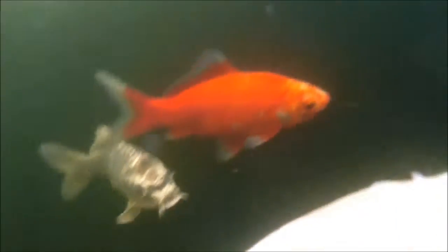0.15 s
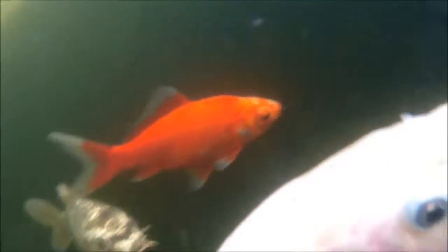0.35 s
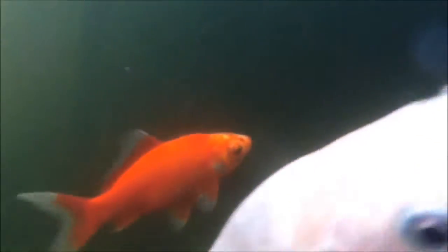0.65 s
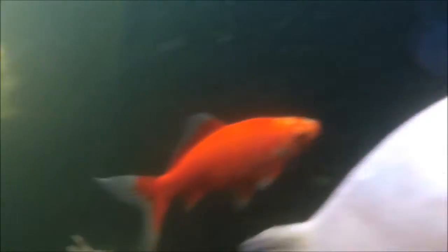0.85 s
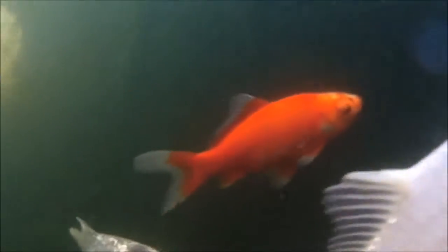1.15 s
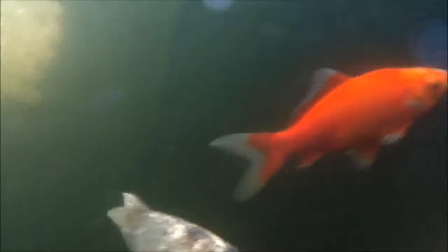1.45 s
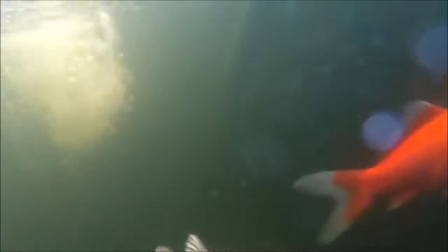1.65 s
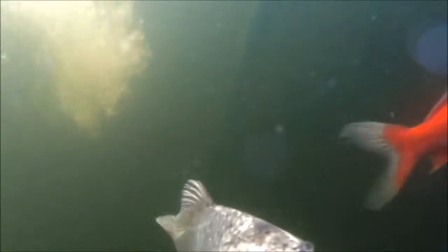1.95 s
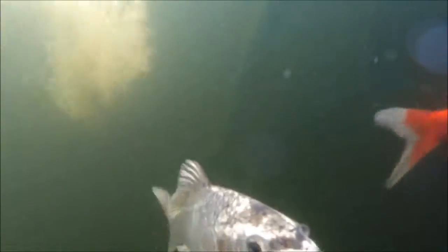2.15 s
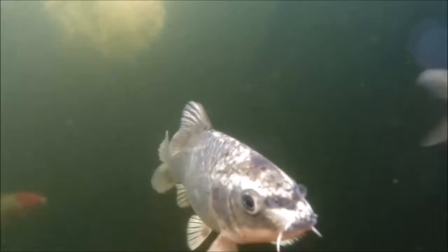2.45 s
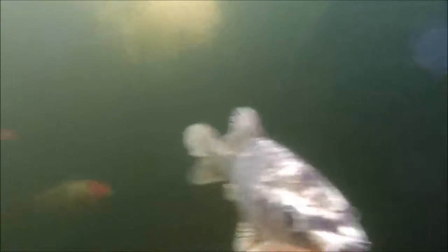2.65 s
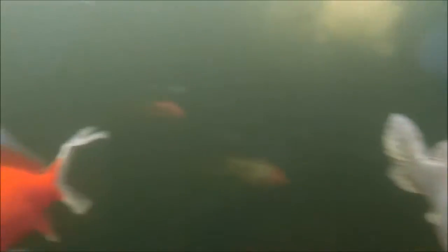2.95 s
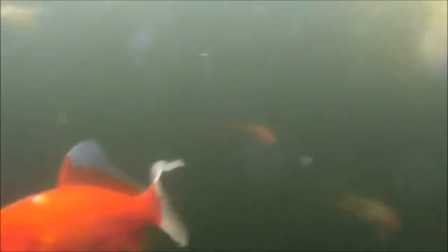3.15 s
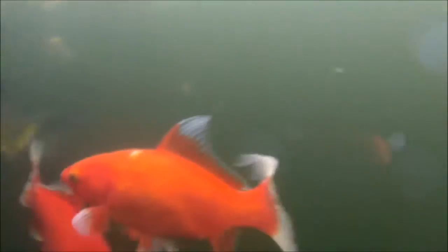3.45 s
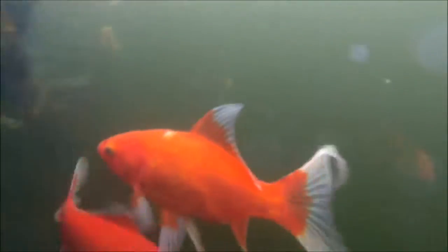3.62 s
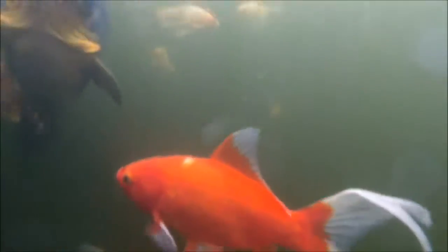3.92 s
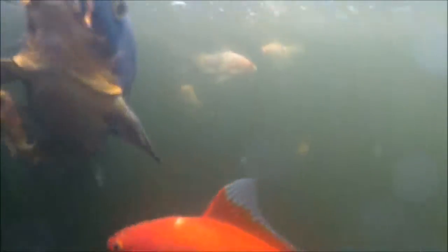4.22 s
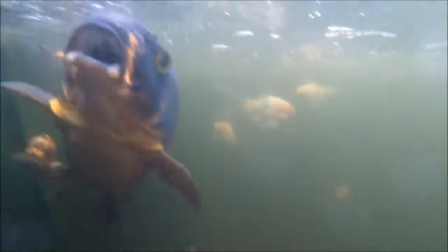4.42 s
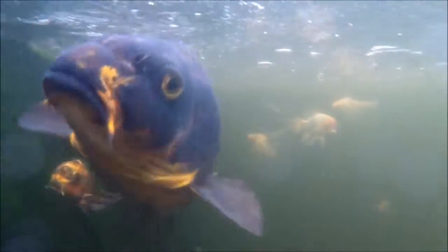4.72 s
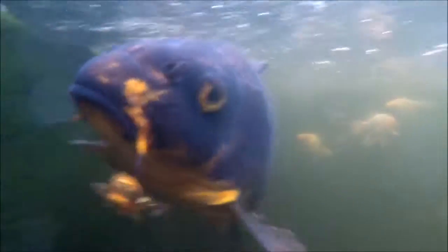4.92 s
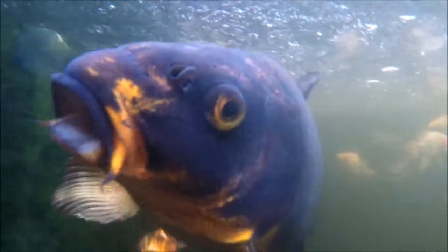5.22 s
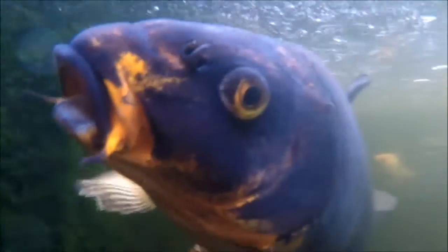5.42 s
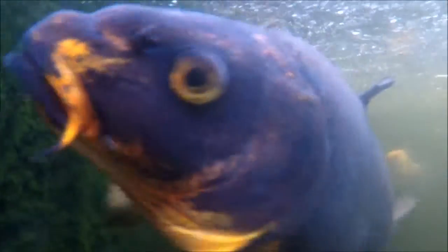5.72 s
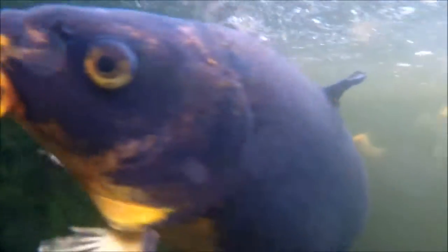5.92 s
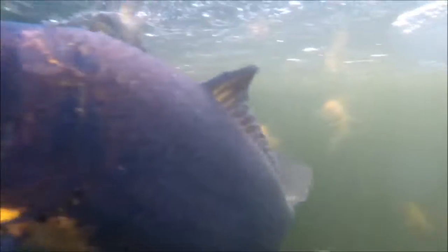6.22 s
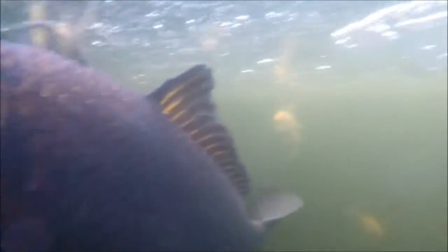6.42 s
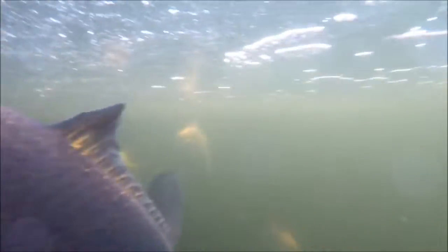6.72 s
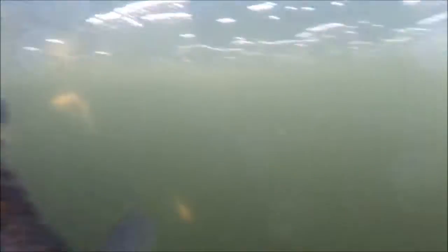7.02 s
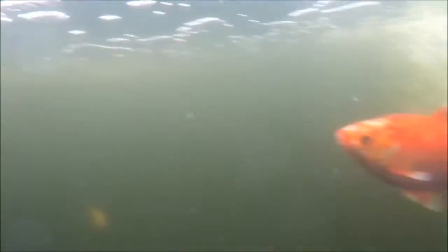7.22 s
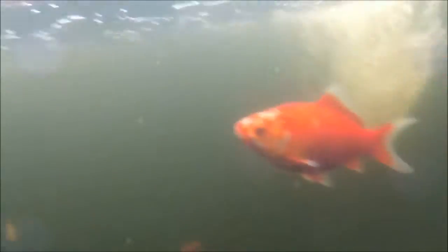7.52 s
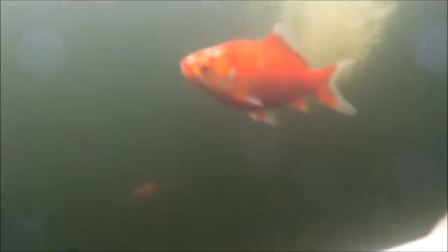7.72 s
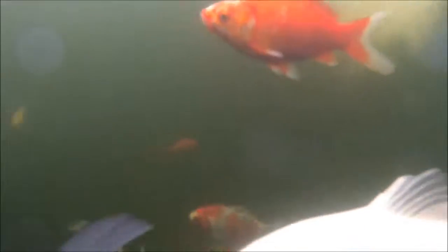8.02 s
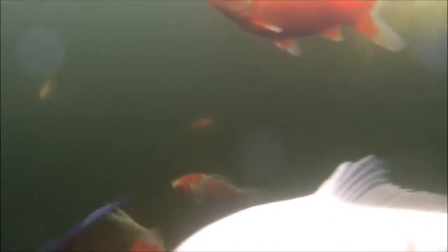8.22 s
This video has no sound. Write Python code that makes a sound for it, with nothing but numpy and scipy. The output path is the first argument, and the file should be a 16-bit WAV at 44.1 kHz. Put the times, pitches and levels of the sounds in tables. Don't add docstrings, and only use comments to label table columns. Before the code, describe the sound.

Muffled pond sound: constant motor hum, swelling pressure rumble, fine bubble fizz, blips and pops, handling taps, and a hard shove near the end.

```python
import sys
import numpy as np
from scipy import signal
from scipy.fft import rfft, irfft, next_fast_len
from scipy.io import wavfile

SR = 44100
rng = np.random.default_rng(int(sys.argv[2]) if len(sys.argv) > 2 else 0)


def boost(x):
    u = np.asarray(x, float) / 20
    return 10 ** u


def waveform_to_disk(signal):
    frames = np.transpose(np.atleast_2d(signal))
    scaled = np.clip(frames, -1, 1) * 32767
    samples = np.round(scaled).astype(np.int16)
    wavfile.write(sys.argv[1], SR, samples)


N = 368676

# time in seconds, level in dB rms.
PUMP_LEVEL = [(0.0, -44), (0.44, -44), (0.67, -46.5), (2.16, -40), (2.93, -41), (4.26, -42), (4.58, -43.5),
              (5.08, -44), (5.66, -42.5), (8.36, -43)]
PUMP_HZ = 122.9
# frequency in Hz, level in dB rms.
WHINE_LINES = [(9448, -80), (9502, -84)]
# start in seconds, length in seconds, level in dB, pitch in Hz.
SINGING_AIR = [
    (0.378, 0.035, -51, 2350),
    (2.098, 0.02, -42, 1520),
    (2.228, 0.02, -48, 1525),
    (2.465, 0.048, -52, 2330),
    (2.721, 0.05, -52, 694),
    (2.963, 0.052, -45.5, 492),
    (3.436, 0.083, -47.5, 2330),
    (3.463, 0.021, -54, 973),
    (4.623, 0.071, -50, 349),
    (7.245, 0.013, -27, 2340),
]

# time in seconds, deep swell level in dB.
SWAY = [(0.0, -27), (0.35, -37.5), (0.8, -25), (1.08, -29), (1.5, -33), (2.56, -33), (2.75, -39),
        (3.2, -36), (4.0, -40.5), (5.3, -43.5), (6.2, -39.5), (6.95, -39.5), (7.6, -36), (8.36, -41.5)]
# frequency in Hz, density in dB per Hz.
DEEP_SPECTRUM = [(12, -10.5), (20, 7.5), (38, -7), (50, -10.5)]
# frequency in Hz, density in dB per Hz.
UPPER_SPECTRUM = [(40, -4), (52, -2), (70, -10.5), (92, -12.5), (112, -14), (140, -32.5)]
UPPER_SWELL_DB, UPPER_PER_DEEP = -45, 0.37
# peak in seconds, rise and fall in seconds each, extra deep swell in dB, extra upper swell in dB.
SURGES_AT_PORT = [
    (1.05, 0.3, -5.5, 2),
    (2.302, 0.44, -2, 3),
    (4.403, .05, 16, 0),
    (5.427, 0.059, -22, 12.5),
    (5.88, 0.05, 5, 11),
    (6.16, 0.1, 1, 13),
    (7.087, 0.12, 8, 10),
    (7.252, 0.13, 35.5, 19),
]
# start in seconds, end in seconds.
STILLED = [
    (7.16, 7.34),
    (7.61, 7.74),
]

# time in seconds, nearness of the plume as cavity fizz in dB, stir by fish in dB.
PLUME_AND_STIR = [(0.0, -68, -0.5), (0.2, -59.5, -2), (0.6, -61.5, -2.5), (1.26, -55.5, -2),
                  (2.14, -51.5, -1), (2.72, -54, -1), (3.1, -53.5, 1.5), (3.91, -53, 0.5),
                  (4.3, -51.5, 1.5), (4.56, -53, 1), (4.91, -48, 0.5), (5.3, -49.5, 0.5),
                  (5.98, -47.5, -1.5), (6.59, -50.5, 1.5), (7.08, -50.5, 2.5), (7.38, -54, -1),
                  (8.36, -55.5, -2.5)]
# frequency in Hz, density in dB per Hz.
GURGLE_SPECTRUM = [(79, -62), (135, -5), (153, -17), (178, -17), (231, -22.5), (356, -22), (1110, -34),
                   (1400, -36), (1820, -52), (3080, -120)]
# frequency in Hz, density in dB per Hz.
HISS_SPECTRUM = [(760, -58), (1300, -14), (1520, 1.5), (1650, -6.5), (2170, -8.5), (2410, 0.5),
                 (3140, -8.5), (5190, -11.5), (7060, -14.5), (9800, -16), (10500, -23.5), (13200, -24),
                 (15100, -27)]
HISS_BORDERS_HZ = (4200, 7000, 10800)
# frequency in Hz, width in Hz, level in dB.
CAVITY_MODES = [(1520, 51, -6), (1725, 51, -3), (1852, 38, -3), (2050, 50, -1), (2330, 50, 3),
                (2510, 45, 0.5), (2680, 50, 0), (2850, 120, -8)]
# frequency in Hz, width in Hz, level in dB.
WALL_MODES = [(3350, 120, 1.5), (3950, 130, 0), (5050, 160, -2), (5500, 170, -2), (6230, 150, -2),
              (7600, 170, -4), (8800, 220, -6), (10200, 250, -11), (12500, 350, -15)]
GURGLE_DB, HISS_DB, MIDDLE_DB = -54.4, -62, -2.5
HISS_PER_STIR, MIDDLE_PER_STIR, HISS_PER_FIZZ, MAIN_PER_FIZZ = 0.57, 0.78, 0.015, .4
PLUNGE_DB, PLUNGE_S = 4.5, 0.08

# start in seconds, peak in dB, pitch in Hz, 60 dB decay in seconds, crack relative to the peak in dB.
TAPS = [
    (0.039, -44.5, 600, 0.019, -10),
    (1.33, -38.5, 810, 0.011, -15),
    (1.507, -33.5, 730, 0.013, -21),
    (1.847, -21.5, 840, 0.0097, -16.5),
    (2.086, -45, 706, 0.012, 5),
    (2.145, -33, 544, 0.0065, 0),
    (3.33, -31, 685, 0.019, -6),
    (7.636, -37.5, 727, 0.012, -4),
    (7.703, -37.5, 1260, 0.019, -15),
]

# start in seconds, length in seconds, body level in dB,
# growth over the stroke in dB, upper level above the body in dB.
STROKES = [
    (0.065, 0.032, -44, 2, -1),
    (0.452, 0.051, -38.5, -6, -10.5),
    (1.066, 0.019, -51.5, -3, -2),
    (3.391, 0.079, -56.5, -3, 1.5),
    (6.81, 0.055, -50.5, -3, -2.5),
    (7.1815, 0.074, -34, -5, -3),
    (7.622, 0.037, -36, 3, -10),
    (7.662, 0.045, -32.5, 6, -13.5),
    (8.088, 0.024, -55, 6, 2),
]
# frequency in Hz, width in Hz, level in dB.
GRIP_MODES = [
    [(305, 100, -13), (600, 540, -2)],
    [(179, 32, -2), (280, 45, -3), (530, 90, -12.5)],
    [(293, 120, 0)],
    [(295, 110, -8), (567, 190, 1)],
    [(310, 44, 0)],
    [(280, 57, -2), (400, 35, 2.5), (523, 53, -0.5)],
    [(250, 80, -6), (427, 41, 1.5), (520, 50, -9)],
    [(180, 110, 1), (285, 15, 4), (408, 45, 1), (526, 17, 1.5)],
    [(280, 33, -6), (554, 190, -18)],
]
# frequency in Hz, width in Hz, level in dB.
RUBBED_HOUSING = [(719, 110, 9), (963, 140, 11), (1214, 320, 11), (1520, 97, 2.5), (1730, 140, 6),
                  (2427, 110, 10), (2760, 120, 4), (4360, 130, -0.5), (2000, 250, -2), (3470, 320, -4)]
CONTACT_CUTOFF_HZ = [1810, 4000, 1500, 1100, 1420, 2940, 4000, 4000, 2500]
RUB_ATTACK_S, BODY_T60_S, UPPER_T60_S = .008, .1, .025

# start in seconds, peak in dB, pitch in Hz, 60 dB decay in seconds.
CAVITY_PINGS = [(1.628, -36, 2120, .04), (1.343, -40, 3050, .04), (5.0, -32, 2350, .09),
                (4.762, -32, 2360, .05), (4.85, -34, 2330, .1), (8.107, -36, 1800, .04),
                (7.497, -37, 2500, .03), (0.7757, -36, 2660, 0.032), (1.3292, -44.5, 2500, 0.27),
                (1.847, -25, 1520, 0.035), (2.0816, -36, 1450, 0.045), (2.143, -28, 2270, 0.023),
                (2.6982, -37, 2330, 0.11), (3.0777, -30.5, 2340, 0.038), (3.2706, -36, 2315, 0.071),
                (3.6804, -24.5, 2330, 0.096), (4.6537, -28, 2330, 0.03), (4.9411, -34.5, 2360, 0.067),
                (5.175, -29, 2330, 0.035), (5.609, -33, 2560, 0.031), (5.9208, -36, 2060, 0.051),
                (6.111, -37, 2330, 0.37), (6.2781, -37, 2300, 0.057), (6.3215, -35.5, 2330, 0.15),
                (7.184, -31, 2330, 0.04), (7.192, -28, 2450, 0.033), (7.221, -26, 2360, 0.05),
                (7.663, -44, 2430, .07), (0.068, -43, 1150, .025), (7.146, -39, 2330, 0.081),
                (7.637, -38, 2650, .03), (7.677, -40, 1800, .05), (0.094, -35, 970, .04),
                (0.079, -42, 980, .03)]
# start in seconds, peak in dB, centre in Hz.
FILM_SNAPS = [(0.4075, -52, 7890), (0.715, -52, 7400), (0.796, -52, 7800), (0.846, -53, 8700),
              (6.875, -48, 8600), (4.326, -48, 7800), (1.1209, -50, 8500), (1.3638, -51, 8500),
              (1.69, -49.5, 9100), (1.8105, -46, 6190), (2.172, -50, 8100), (2.4784, -49.5, 6300),
              (3.043, -46.5, 6840), (3.1, -52, 8800), (3.262, -46, 5740), (3.3283, -46.5, 5700),
              (3.743, -51, 5280), (3.986, -49.5, 5810), (4.141, -49, 6240), (4.184, -48, 5660),
              (4.323, -47, 5400), (4.7546, -45, 5250), (5.03, -51, 7550), (5.054, -48, 8400),
              (5.8306, -51.5, 9800), (6.1719, -49, 5450), (6.787, -49, 5380), (6.895, -47, 5970),
              (7.077, -45.5, 5840), (7.296, -48, 5320), (7.639, -48, 6200), (7.671, -48, 5940),
              (0.9522, -55, 7170), (1.2421, -53, 5950), (1.5379, -50, 7680), (1.7704, -53, 5280),
              (1.7863, -50, 7570), (2.599, -50, 6430), (2.6953, -49, 5640), (3.6007, -51, 8670),
              (3.9135, -51, 5000), (4.1081, -51, 6030), (4.4782, -50, 5450), (4.8758, -54, 6070),
              (4.9821, -51, 5670), (5.8566, -51, 6250), (5.8965, -51, 8600), (6.039, -49, 6600),
              (6.107, -48, 6200), (6.3315, -50, 6700), (6.4612, -50, 5720), (6.5999, -53, 8440),
              (6.7531, -56, 5040), (6.8344, -52, 6260), (6.9137, -47.5, 4990), (7.6061, -47, 6330),
              (7.8471, -54, 5210), (8.1095, -53, 7450), (8.1394, -51, 5740)]
# start in seconds, peak in dB, centre in Hz, half spread in octaves.
WIDE_SNAPS = [
    (0.7655, -46, 2300, 0.2),
    (0.7757, -41, 4200, 0.3),
    (7.1465, -31, 6800, .25),
    (3.405, -47, 980, .15),
    (7.037, -41, 700, 0.25),
]
# start in seconds, peak in dB, centre in Hz.
TINY_SNAPS = [(0.99, -46, 9800), (1.2241, -53, 10800), (1.6901, -59, 12000), (1.7095, -53, 12300),
              (1.7634, -58, 12400), (1.8452, -59, 10700), (2.1296, -54, 10600), (2.1715, -60, 13200),
              (2.2283, -58, 13800), (2.8539, -53, 12300), (2.9427, -60, 11600), (3.0081, -59, 11600),
              (3.329, -48, 9500), (3.6301, -55, 13200), (3.8397, -55, 10700), (4.0662, -52, 10700),
              (4.1155, -61, 11400), (4.2383, -58, 10500), (5.4216, -58, 11800), (5.831, -50, 11400),
              (6.4837, -51, 11500), (6.6603, -59, 12700), (6.9671, -56, 12900), (7.0815, -46, 8600),
              (3.172, -57, 12000), (7.6725, -51, 11600)]
SNAP_OCTAVES, CLICK_OCTAVES, SPARK_OCTAVES = .11, .3, .2
SNAP_T60_S, SPARK_T60_S, SOFT_CLICK_DB, HARD_CLICK_DB = .07, 0.03, -6, 8

# start in seconds, peak in dB, signed pitch in Hz, 60 dB decay in seconds.
SHOVES = [
    (0.463, -27.5, 42, 0.095),
    (7.204, -22, 20, 0.11),
    (7.249, -17, 57, 0.071),
    (7.259, -27, -13.5, 0.14),
    (7.624, -26.5, -37.5, 0.17),
    (7.708, -26.5, 20, 0.16),
]
# start in seconds, peak in dB, pitch in Hz, 60 dB decay in seconds.
GULPS = [(2.066, -23, 347, 0.021), (2.507, -44.5, 332, 0.063), (2.086, -44, 210, 0.068),
         (0.476, -48, 200, 0.042), (2.752, -50, 405, 0.062), (3.084, -44, 271, 0.1),
         (3.224, -47, 280, 0.05), (3.686, -38, 277, 0.037), (4.051, -45.5, 386, 0.092),
         (4.11, -40, 240, 0.041), (4.168, -40.5, 400, 0.04), (4.238, -37, 280, 0.034),
         (4.31, -45, 390, 0.044), (4.383, -36, 302, 0.022), (4.576, -27.5, 401, 0.021),
         (4.677, -38.5, 290, 0.081), (4.969, -44.5, 260, 0.043), (5.093, -39, 367, 0.03),
         (5.156, -42.5, 520, 0.037), (5.225, -28.5, 280, 0.034), (5.298, -40.5, 395, 0.034),
         (5.421, -42, 350, 0.034), (5.628, -33.5, 248, 0.037), (5.848, -41.5, 276, 0.036),
         (6.155, -34, 310, 0.032), (6.21, -34.5, 298, 0.025), (6.697, -44, 246, 0.045),
         (6.998, -37.5, 248, 0.043), (7.034, -34, 323, 0.058), (7.192, -27.5, 383, 0.12),
         (7.208, -29, 280, 0.11), (7.69, -36, 344, 0.06)]
# start in seconds, peak in dB, pitch in Hz, 60 dB decay
# in seconds.
MORE_GULPS = [(0.674, -46, 221, 0.035), (1.24, -47, 240, 0.044), (1.795, -48, 248, 0.043),
              (2.691, -49, 258, .04), (2.758, -40, 300, .03), (2.799, -48, 530, 0.044),
              (3.091, -46, 520, .05), (3.327, -35, 260, 0.031), (3.455, -51, 564, .05),
              (3.611, -49, 272, .04), (3.941, -48, 292, 0.086), (4.117, -42, 390, 0.049),
              (4.19, -39, 460, 0.035), (4.205, -49, 565, .05), (4.276, -47, 390, .06),
              (4.283, -48, 570, .04), (4.34, -47, 535, .04), (4.409, -47, 390, 0.076),
              (4.5, -46, 330, 0.035), (5.014, -46, 350, .04), (5.178, -43, 370, 0.046),
              (5.349, -48, 431, 0.036), (5.75, -48, 520, 0.027), (5.781, -44, 258, .03),
              (5.849, -43, 400, 0.028), (6.062, -49, 350, .03), (6.084, -45, 290, 0.042),
              (6.102, -42, 338, 0.035), (6.142, -45, 500, .02), (6.205, -44.5, 530, 0.046),
              (6.265, -54, 470, 0.036), (6.383, -46, 340, .04), (6.619, -47, 350, .04),
              (7.603, -40, 260, 0.047), (7.682, -39, 400, .05), (7.705, -29, 280, 0.12),
              (8.117, -44, 285, 0.062)]
# frequency in Hz, width in Hz, level in dB.
MOUNT_MODES = [(280, 45, -1), (390, 65, -1), (530, 37, -3), (750, 73, -13.5)]
MOUNT_DB = 1
# start in seconds, peak in dB, pitch in Hz.
SMALL_POPS = [(2.0844, -36, 3530), (2.144, -45, 3130), (2.3817, -45, 3900), (2.4485, -43.5, 3920),
              (2.9554, -41, 3040), (3.0218, -40.5, 4100), (3.711, -41, 3800), (4.0345, -47, 4380),
              (6.8685, -47, 3930), (6.999, -35, 2880), (7.2023, -41, 3100), (7.3095, -40, 3550),
              (7.701, -40, 3140)]
# start in seconds, peak in dB, pitch in Hz.
PLUME_CHIMES = [(2.6233, -44, 1500), (2.7365, -48, 1550), (2.8932, -48, 1540), (2.9401, -48, 1520),
                (2.9755, -49, 1510), (3.0952, -46, 1520), (3.2668, -46, 1540), (3.3276, -42, 1486),
                (3.4813, -48, 1730), (3.635, -45, 1480), (3.86, -43, 1500), (4.2747, -41.5, 1730),
                (4.3395, -41, 1500), (4.3848, -45, 1530), (4.411, -42, 1700), (4.6547, -41, 1680),
                (4.934, -44, 1510), (5.282, -45, 1820), (5.5616, -47, 1730), (5.6145, -48, 1840),
                (5.7492, -49, 1840), (5.7791, -44, 1830), (5.9208, -50, 1830), (6.1308, -44, 1550),
                (6.1612, -44, 1820), (6.2041, -48, 1660), (6.3753, -42, 1800), (6.4316, -49, 1730),
                (6.6227, -46, 1510), (6.7479, -46, 1830)]
CHIME_T60_S = 0.09


def rms_one(x):
    return x / np.sqrt(np.mean(x ** 2) + 1e-20)


def in_time(rows):
    s, *columns = np.transpose(rows)
    return [np.interp(np.arange(N) / SR, s, c) for c in columns]


def drift(rate):
    r = np.exp(-80 * np.pi * rate / SR)
    noise = rng.standard_normal(N // 40 + 2002)
    slow = signal.lfilter([1], [1, -2 * r, r * r], noise)[2000:]
    return np.interp(np.arange(N) / 40, np.arange(len(slow)), rms_one(slow))


def coloured(spectrum):
    size = next_fast_len(N)
    hz, db = np.transpose(spectrum)
    log_hz = np.log(np.arange(size // 2 + 1) * SR / size + 1)
    outside = np.maximum(np.log(hz[0]) - log_hz, 0) + np.maximum(log_hz - np.log(hz[-1]), 0)
    shape = boost(np.interp(log_hz, np.log(hz), db) - 27.6 * outside)
    return rms_one(irfft(rfft(rng.standard_normal(size)) * shape, size)[:N])


def resonate(x, modes):
    out = 0
    for k, (hz, width, db) in enumerate(modes):
        r = np.exp(-np.pi * max(width, 5) / SR)
        b = (1 - r * r) / 2 * np.array([1, 0, -1]) / np.sqrt(1 - r)
        a = [1, -2 * r * np.cos(2 * np.pi * hz / SR), r * r]
        out = out + (-1) ** k * boost(db) * signal.lfilter(b, a, x)
    return out


def grains(per_s, spread_db):
    sizes = boost(spread_db * np.minimum(rng.exponential(1, N), 4)) * rng.choice([-1, 1], N)
    return sizes * (rng.random(N) < per_s / SR) + 1e-18


def dull(x, cut_hz):
    return signal.sosfilt(signal.butter(2, cut_hz, fs=SR, output="sos"), x)


def around(x, hz, octaves):
    edges = [hz / 2 ** abs(octaves), min(hz * 2 ** abs(octaves), 16000)]
    return signal.sosfilt(signal.butter(2, edges, "band", fs=SR, output="sos"), x)


def add(out, s, db, hz, t60, rise=0., soft_s=.0005):
    t = np.arange(int(t60 * SR) + 9) / SR
    envelope = boost(db - 60 * t / t60) * (1 - np.exp(-t / soft_s))
    ring = np.sin(2 * np.pi * hz * t * (1 + rise * t / t60)) * envelope
    i = round(s * SR)
    out[i:i + len(t)] += ring[:N - i]


def pump():
    db, = in_time(PUMP_LEVEL)
    phase = 2 * np.pi * np.cumsum(PUMP_HZ + 1.02 * drift(6.9)) / SR
    return np.sqrt(2) * boost(db + 1.0 * drift(24)) * np.sin(phase)


def electronics():
    t = np.arange(N) / SR
    return sum(np.sqrt(2) * boost(db) * np.sin(2 * np.pi * hz * t) for hz, db in WHINE_LINES)


def pressure():
    t, (deep_db,) = np.arange(N) / SR, in_time(SWAY)
    upper_db = UPPER_SWELL_DB + UPPER_PER_DEEP * (deep_db + 41.5)
    for s, length, more_deep_db, more_upper_db in SURGES_AT_PORT:
        surge = np.maximum(1 - np.abs(t - s) / length, 0)
        deep_db = deep_db + more_deep_db * surge
        upper_db = upper_db + more_upper_db * surge
    still = np.prod([np.interp(t, [a - .04, a, b, b + .04], [1, .15, .15, 1]) for a, b in STILLED], axis=0)
    deep = boost(deep_db + 1.23) * coloured(DEEP_SPECTRUM)
    upper = boost(upper_db - 0.83 + 0.32 * drift(0.88)) * coloured(UPPER_SPECTRUM)
    return still * (deep + upper)


def bubbles(low_hz, high_hz, per_s, cycles, spread_db):
    clicks, dealt = grains(per_s, spread_db), rng.integers(0, 16, N)
    out = 0
    for k, hz in enumerate(np.geomspace(low_hz, high_hz, 16)):
        out = out + resonate(clicks * (dealt == k) + 1e-18, [(hz, 1.2 * hz / cycles, 0)])
    return rms_one(out)


def gurgle():
    flow = boost(1.14 + 1.7 * drift(9.1)) * coloured(GURGLE_SPECTRUM)
    return flow + boost(-11) * bubbles(202, 697, per_s=50, cycles=14.6, spread_db=2.0)


def fizz(middle_db, main_db):
    clicks = grains(1300 * boost(3.0 * drift(14)), spread_db=2.2)
    out = 0
    for k, mode in enumerate(CAVITY_MODES):
        middle, main = k in (1, 2, 3), k == 4
        swell_db = 0.8 * drift(0.69) + 2.6 * drift(11) + middle * middle_db + main * main_db
        struck = np.roll(clicks, k * N // 8) + 0.33 * clicks
        out = out + (-1) ** k * boost(swell_db) * resonate(struck, [mode])
    return rms_one(out)


def flicker(x, patchy_db):
    below = [0, *(dull(dull(x, hz), hz) for hz in HISS_BORDERS_HZ), x]
    return sum(boost(patchy_db * drift(25.6)) * (upper - lower) for lower, upper in zip(below, below[1:]))


def crackle():
    clumps = drift(3.8)
    out = 0
    for mode in WALL_MODES:
        per_s = 150 * boost(0.5 * clumps + 4.5 * drift(5.0))
        out = out + resonate(grains(per_s, spread_db=3.5), [mode])
    return rms_one(out)


def hiss():
    return boost(1.3 + 0.3 * drift(27)) * flicker(coloured(HISS_SPECTRUM), patchy_db=2.1) + boost(-2.2) * crackle()


def water():
    fizz_db, stir_db = in_time(PLUME_AND_STIR)
    froth_db = PLUNGE_DB * np.exp(-np.arange(N) / SR / PLUNGE_S)
    nearer_db = fizz_db - fizz_db.mean()
    hiss_db = HISS_DB + HISS_PER_STIR * (stir_db + froth_db) + HISS_PER_FIZZ * nearer_db
    ringing = fizz(MIDDLE_DB + MIDDLE_PER_STIR * stir_db, MAIN_PER_FIZZ * nearer_db)
    return boost(GURGLE_DB + stir_db + froth_db) * gurgle() + boost(fizz_db - 2.5) * ringing + boost(hiss_db) * hiss()


def snaps():
    faint = [(s * 8.2, -63 + 9 * size ** 2, 5000 * 2.7 ** pitch) for s, size, pitch in rng.random((40, 3))]
    every = [(*snap, SNAP_OCTAVES, SNAP_T60_S, SOFT_CLICK_DB) for snap in [*FILM_SNAPS, *faint]]
    every += [(*tick, SNAP_T60_S, HARD_CLICK_DB) for tick in WIDE_SNAPS]
    every += [(*spark, SPARK_OCTAVES, SPARK_T60_S, HARD_CLICK_DB) for spark in TINY_SNAPS]
    out, t = np.zeros(N), np.arange(SR // 12) / SR
    for s, db, hz, spread, t60, click_db in every:
        less_db = .5 * max(click_db, 0)
        tail = rms_one(around(rng.standard_normal(len(t)), hz, spread))
        tail = boost(-4.5 - less_db - 60 * t / t60) * (1 - np.exp(-t / 0.0006)) * tail
        click = around(1. * (t == 0), hz, spread + CLICK_OCTAVES)
        click = boost(click_db) * click / np.abs(click).max()
        out[round(s * SR):][:len(t)] += boost(db - less_db) * (tail + click)
    return out


def taps():
    out, crack = np.zeros(N), np.zeros(N)
    for s, db, hz, t60, crack_db in TAPS:
        add(out, s, db + 8.5, hz, t60, rise=0.022, soft_s=0.00059)
        crack[round(s * SR)] = boost(db + crack_db)
    wall = [(500, 1300, -13), (1510, 340, -4), (2250, 760, -4.0), (3220, 500, -7.5)]   # Hz, width Hz, dB
    return out + 8.5 * dull(resonate(crack + 1e-18, wall), 3900)


def rubs():
    slips = grains(3000, spread_db=1.5) * boost(1.5 * drift(63))
    out = np.zeros(N)
    for (s, length, db, growth_db, upper_db), modes, cut_hz in zip(STROKES, GRIP_MODES, CONTACT_CUTOFF_HZ):
        span = slice(round(s * SR), round((s + length + BODY_T60_S) * SR))
        t = np.arange(span.stop - span.start) / SR
        touch = np.minimum(t / RUB_ATTACK_S, 1) * boost(db + growth_db * (np.minimum(t / length, 1) - .5))
        lifted = np.maximum(t - length, 0)
        body = rms_one(dull(resonate(slips[span], modes), 1740))
        upper = rms_one(dull(resonate(slips[span], RUBBED_HOUSING), cut_hz))
        body = boost(-60 * lifted / BODY_T60_S) * body
        upper = boost(upper_db - 60 * lifted / UPPER_T60_S) * upper
        out[span] += touch * (body + upper)
    return out


def cavity_rings():
    out = np.zeros(N)
    for s, db, hz, t60 in CAVITY_PINGS:
        add(out, s, db - 6.0, hz, t60, soft_s=0.00085)
    for s, db, hz in PLUME_CHIMES:
        add(out, s, db - 5.0, hz, CHIME_T60_S, soft_s=0.0013)
    return out


def singing_air():
    out = np.zeros(N)
    for s, length, db, hz in SINGING_AIR:
        t = np.arange(int(length * SR)) / SR
        swell = np.sqrt(np.sin(np.pi * t / length))
        out[round(s * SR):][:len(t)] += boost(db) * swell * np.sin(2 * np.pi * hz * t)
    return out


def shoves():
    out = np.zeros(N)
    for s, db, hz, t60 in SHOVES:
        add(out, s, db + 9.0, -hz, t60, soft_s=0.0042)
    return out


def gulps():
    out, jolt = np.zeros(N), np.zeros(N)
    for s, db, hz, t60 in [*GULPS, *MORE_GULPS]:
        jolt[round((s + .002) * SR)] = boost(db + MOUNT_DB)
        add(out, s, db + 7.0, hz, t60, rise=0.013, soft_s=0.0026)
        add(out, s, db - 17, 1.7 * hz, 1.6 * t60, soft_s=0.0069)
    return out + resonate(jolt + 1e-18, MOUNT_MODES)


def pops():
    out = np.zeros(N)
    for s, db, hz in SMALL_POPS:
        add(out, s, db - 0.5, hz, .027, rise=0.0063, soft_s=0.00089)
    return out


def scene():
    steady = pump() + electronics() + pressure() + water()
    handling = taps() + rubs() + shoves()
    air = snaps() + cavity_rings() + singing_air() + gulps() + pops()
    return (steady + handling + air)[None]


def low_pass(x):
    return signal.sosfilt(signal.butter(12, 15230, fs=SR, output="sos"), x)


def record(dry):
    passed = signal.sosfilt(signal.butter(2, [11, 14500], "band", fs=SR, output="sos"), dry)
    rounded = passed / (1 + (np.abs(passed) / .25) ** 4) ** .25
    return low_pass(rounded)


dry = scene()
out = record(dry)
waveform_to_disk(out)
```